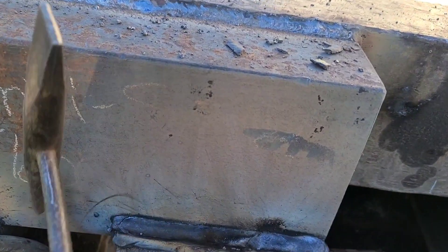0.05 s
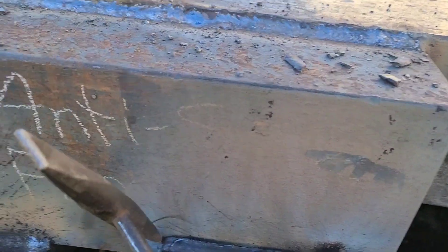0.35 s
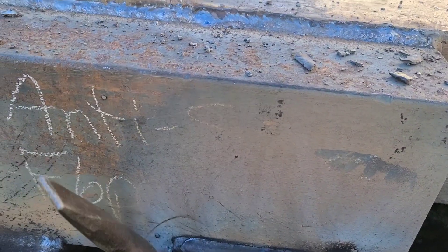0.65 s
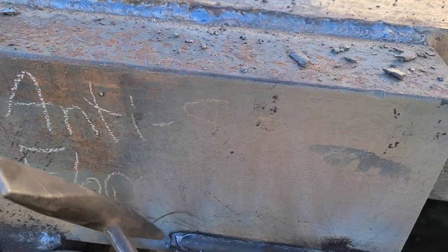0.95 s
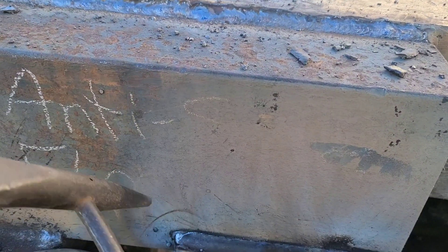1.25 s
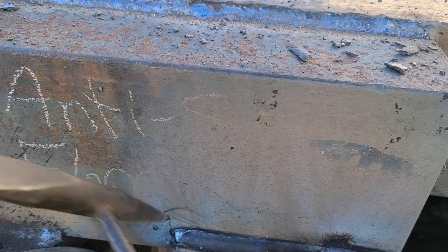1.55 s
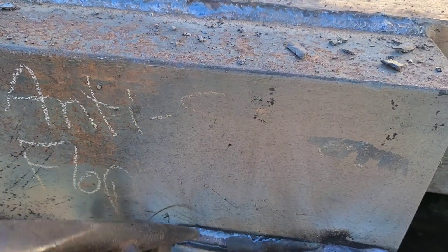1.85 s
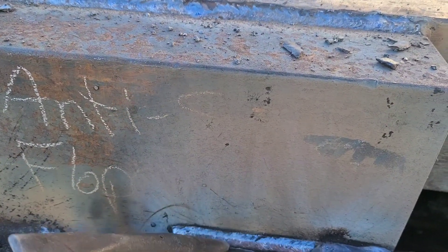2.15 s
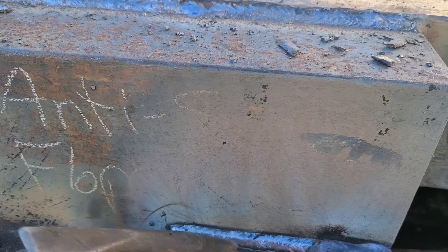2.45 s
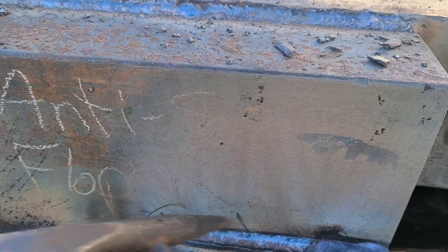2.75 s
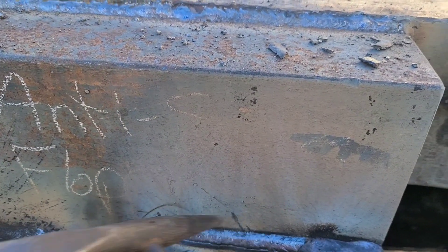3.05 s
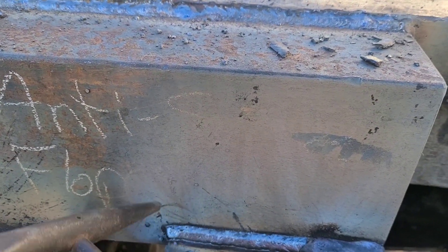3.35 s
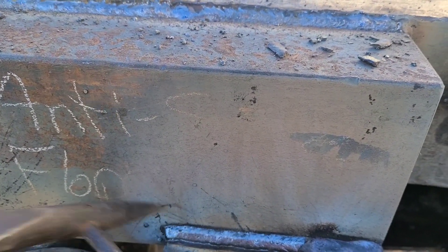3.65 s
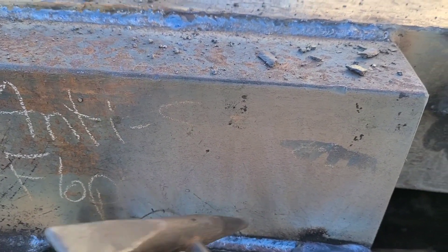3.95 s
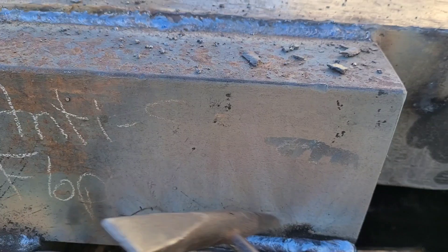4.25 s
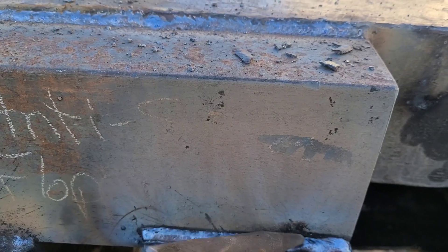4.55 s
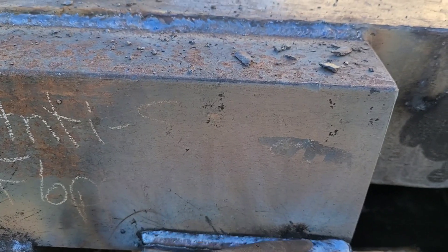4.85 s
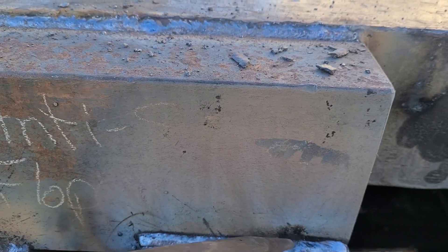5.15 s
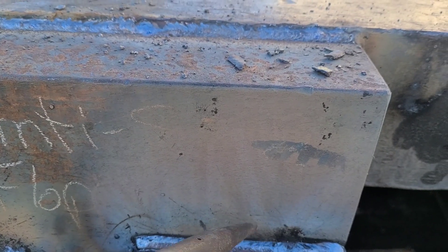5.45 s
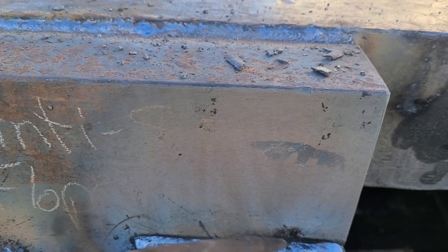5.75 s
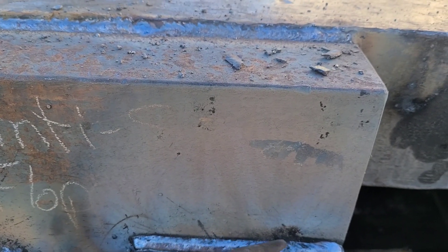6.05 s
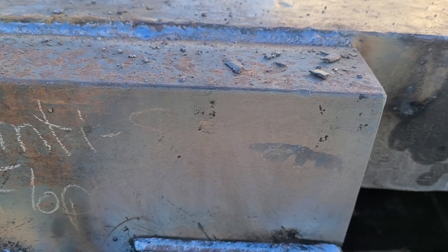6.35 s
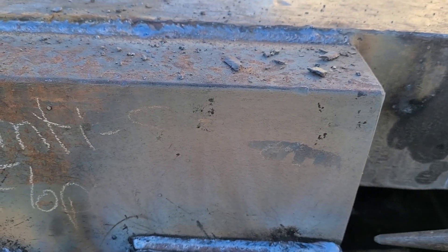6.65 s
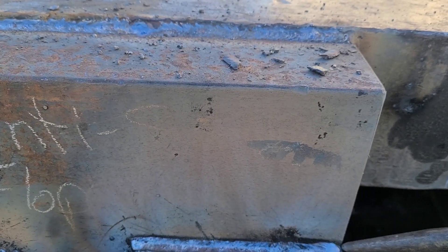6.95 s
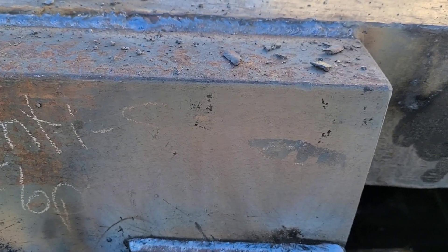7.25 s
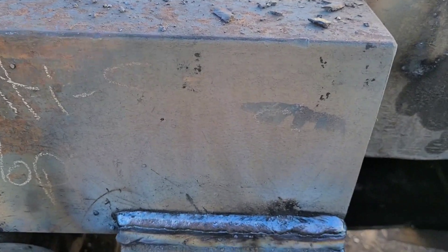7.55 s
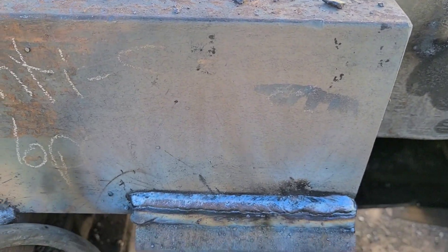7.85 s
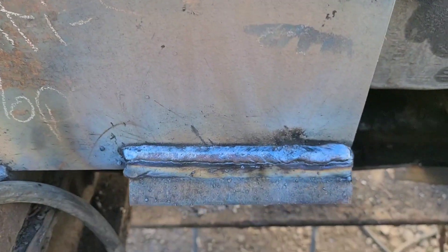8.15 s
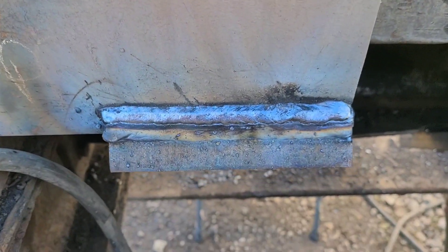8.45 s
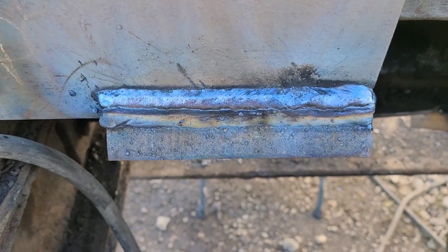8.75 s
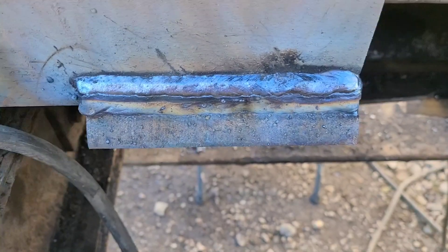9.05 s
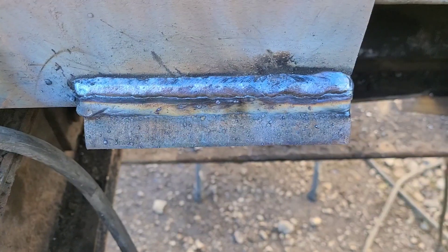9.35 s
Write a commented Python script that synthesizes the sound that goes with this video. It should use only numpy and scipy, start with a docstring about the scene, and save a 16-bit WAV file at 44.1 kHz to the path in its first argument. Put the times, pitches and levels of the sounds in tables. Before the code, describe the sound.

A chipping hammer knocks slag off a weld on a hollow steel beam, about four blows a second. Each blow gives a short clang, a high ping and a soft low boom, with small skips, gritty scrapes and ticking crumbs between. The chipping stops, a soft scuff passes, and the hammer lands hard on a steel bench and bounces to rest. The work sounds close, over a faint workshop hum and rumble.

```python
"""A welding set hums in a workshop, over rumble and hiss. A chipping hammer starts knocking slag off a
fresh weld on a hollow steel beam, about four blows a second. Each blow clangs the beam, pings the hammer
head and wakes a late, low boom; the pick skips, grinds through slag and scatters crumbs. The chipping
stops, a soft scuff passes, and the hammer comes down hard on the steel bench and bounces to rest."""
import sys
import numpy as np
from scipy import signal
from scipy.io import wavfile

SR = 44100
rng = np.random.default_rng(int(sys.argv[2]) if len(sys.argv) > 2 else 0)


def file_out(sig):
    """Save sig as 16-bit WAV at sys.argv[1]."""
    # one column per channel
    cols = np.atleast_2d(sig).T
    # limit, then scale
    lim = np.clip(cols, -1, 1)
    pcm = np.round(lim * 32767).astype(np.int16)
    wavfile.write(sys.argv[1], SR, pcm)


N = 423360
TIME = np.arange(N) / SR
AGE = TIME[:SR // 2]   # seconds since a hit
EDGES_HZ = 22 * 2 ** np.arange(0, 9.7, .4)
BAND_HZ = np.sqrt(EDGES_HZ[1:] * EDGES_HZ[:-1])

# stereo width of all noise: frequency_hz, left_right_correlation
STEREO_LIKENESS = [(30, 0.96), (130, 0.65), (400, 0.12), (700, 0.39), (1400, -0.5), (3000, -0.036),
                   (7000, 0.11)]
# tone of the workshop's rumble: frequency_hz, level_db
RUMBLE_COLOUR = [(15, -41), (25, -12), (70, 3.5), (175, -12.5), (200, -13.5), (285, -10.5), (317, -21.5),
                 (373, -10.5), (489, -26.5), (575, -15.5), (911, -20.5), (1100, -19.5), (6920, -40),
                 (16000, -57)]
# fader ride on the hiss: time_s, level_db
HISS_FADER = [(0, -47.5), (.5, -62.5), (8.2, -64), (9.6, -75)]
# tone of the hiss: frequency_hz, level_db
HISS_COLOUR = [(1000, 3), (2500, 0), (6500, -5.5), (9000, -13), (12500, -13), (16000, -5.5)]
# partials of the welding set's fan: pitch_hz, level_db
FAN_PARTIALS = [(172, -68), (285.3, -61), (382, -76), (570.6, -60), (856, -74), (1141, -74)]

# pick on weld, plus two soft booms near 6.35 s as the steel rocks; bite is high on bare steel,
# low on slag: start_s, strength_db, boom_db, bite_db, ping_db
BEAM_HITS = [(0.456, -16, -27, -18, 8.5), (0.5272, -11.5, -17.5, -6, -1), (0.75, -2.5, -8.5, -14.5, 7.5),
             (0.7925, -5, -23, -16, 4), (1.005, 4.5, 0, -17.5, -27), (1.255, -11, -13, 12, -7),
             (1.2652, -2.5, -14.5, -18, 5), (1.4932, -7, -16, -7.5, 16.5), (1.5049, 1.5, -4, -6.5, -21),
             (1.7538, 5, 2.5, -12, 3), (1.995, 0, 3, 2, 4), (2.2602, -1, 1, 3.5, 13.5),
             (2.2887, -9, -7, 6.5, 7), (2.522, 0, 1.5, 4, -8), (2.765, -12.5, -14.5, 5.5, 6),
             (2.782, -0.5, -1, 1, 15), (3.039, -1, 2.5, 0.5, -31), (3.366, 2, -5.5, -19.5, -7.5),
             (3.5946, -15, -5.5, -8.5, -12), (3.661, 0, -3.5, -1, 5.5), (3.839, 0, -10, -14.5, 2),
             (3.8555, 2, -1.5, -6.5, 2), (4.194, -11.5, -1.5, 14, -10.5), (4.465, 3, 4.5, -3.5, -23),
             (4.696, -10.5, -14, -7, 4), (4.716, -13, -8.5, 11, -7.5), (4.957, -14, -14, 7, -4.5),
             (5.007, -19.5, -10, -14, 5), (5.211, -6.5, -13.5, -1, 2.5), (5.2148, -2, -8, -4.5, 4),
             (5.448, -6, 4, -9, 1.5), (5.694, 1.5, -8, -5.5, -8.5), (5.9393, 4, -0.5, -1.5, 4.5),
             (6.196, 4, 2.5, -1.5, -10), (6.331, -38, -13, -1, 3.5), (6.365, -25, -17, -6, -2.5),
             (6.704, -.5, -12, 3.5, 9), (6.902, 4, -7.5, -8.5, -11), (7.1171, 3, -6, -0.5, 6),
             (7.136, -5.5, -10.5, -6.5, 6.5), (7.3304, -0.5, -5.5, 1, 14.5), (7.348, -1, -16, -10, -2)]
# the five EQ points that colour each hit: frequency_hz
REGISTER_HZ = [750, 1300, 2100, 4500, 9500]
# the spot struck moves along the weld, tipping the clank to 2.1 kHz (-) or 1.3 kHz (+): time_s, tilt_db
SPOT_TILT = [(0.75, 0.5), (1.8, -2.5), (3.0, 1), (3.7, -5), (4.5, 2), (6.2, 1.6), (6.7, 7), (7.4, 6)]
# the beam's crowd of short modes: frequency_hz, level_db
BEAM_CLANG = [(150, 4), (250, 6), (330, 16.5), (600, 18), (900, 14), (1200, 17.5), (1500, 16.5), (2050, 18),
              (2700, 14), (4200, 13), (5400, 11.5), (9000, 5), (10500, -2.5), (14500, 6.5)]
# clear notes of the beam, plus the long ring of the hammer and its spring handle:
# pitch_hz, level_db, t60_s
BEAM_HIT_MODES = [(71.5, -53.5, .6), (115, -49.5, .8), (410, -37.5, 0.11), (508, -32, 0.27),
                  (698, -49, 0.69), (800, -27, 0.17), (962, -43, 0.28), (1070, -31, 0.18),
                  (1138, -31, 0.22), (1300, -44.5, 0.76), (1316.6, -27, 0.2), (1632, -25, 0.2),
                  (1792, -46.5, 1), (1843, -22.5, 0.14), (1862, -29, 0.31), (2012, -26, 0.19),
                  (2067, -22, 0.15), (2190, -19, 0.067), (2460, -50.5, 0.24), (2674, -47, 0.63),
                  (2370, -47, 0.21), (3185, -53.5, 0.57)]
# the hammer head's ping: pitch_hz, level_db, t60_s
HAMMER_MODES = [(4050, -19, .025), (4180, -17, .04), (4250, -28, .1), (6196, -28, .055), (8380, -21.5, .04),
                (8460, -21.5, .055), (8520, -47, .2), (9377, -25, .045), (11960, -33, .03),
                (13937, -28.5, .06)]
# clang envelope, before each body's decay_scale: frequency_hz, rise_s, steel_t60_s, room_db, room_t60_s
CLANG_ENVELOPE = [(194, 0.0051, 0.44, -12, 0.22), (800, 0.0025, 0.16, -37, 0.15),
                  (2240, 0.0035, 0.15, -30, 0.61), (4860, 0.00024, 0.056, -37.5, 0.33),
                  (8900, 0.0016, 0.057, -27, 0.11), (15000, .0003, 0.059, -39, .16)]
# where the hits sit in the stereo image: frequency_hz, left_minus_right_db
HIT_PAN = [(450, -2.5), (2000, 0.36), (4500, 1.5), (8400, 2), (13900, -1.5)]
# the hollow beam's boom swells late and returns in beats: delay_s, level_db, half_width_s
BOOM_BEATS = [(0.0219, -13.5, 0.0068), (0.042, -23, 0.0071), (.062, -27, 0.0044), (.098, -31, .016),
              (0.124, -43, 0.027)]
# the pick's hardest skips on the bead: start_s, level_db
SKIPS = [(0.737, -26.5), (0.828, -28.5), (0.9028, -36), (1.086, -36), (1.3515, -30.5), (2.233, -18),
         (2.3054, -27), (3.0785, -26.5), (3.4035, -28), (3.917, -26.5), (3.9472, -28), (5.2144, -15),
         (5.5256, -25.5), (5.7382, -27.5), (6.7535, -35)]
# tone of a skip: frequency_hz, level_db
SKIP_CLANG = [(300, 5), (600, 9.5), (1200, 5.4), (2100, 6.7), (3000, 4.7), (4200, 6.6), (5400, 18),
              (9000, 7.9), (10500, 2.7), (14500, 6.4)]
# the pick grinds through slag: start_s, end_s, level_db
GRINDS = [(1.512, 1.541, -30), (2.204, 2.273, -40.5), (4.702, 4.792, -44.5), (4.961, 5.041, -48),
          (6.233, 6.307, -51)]
# a piece of slag breaks up in a shower: start_s, end_s, level_db
SHOWERS = [(2.074, 2.201, -35.5)]
# tone of a crumb's tick: frequency_hz, level_db
CRUMB_COLOUR = [(400, 8.5), (900, -14.5), (3000, -6.5), (7000, 7.5), (12000, 7.5), (16000, 9)]

# tone of the scuff: frequency_hz, level_db
SCUFF_COLOUR = [(150, -1), (400, 4), (900, -9.5), (1600, -13), (7000, -16.5), (9500, -26.5), (13000, -17),
                (16000, -27)]
# hammer on bench, head first, then handle and bounces: start_s, strength_db, thud_db, dull_above_hz
BENCH_HITS = [(8.3362, 1, -6.5, 15200), (8.3753, 2.5, -0.5, 4600), (8.442, -28.5, 13.5, 2300),
              (8.474, -19.5, 6.5, 1220)]
# the bench's crowd of short modes: frequency_hz, level_db
BENCH_CLANG = [(100, 2.5), (200, 21), (300, 8), (450, 24.5), (1000, 27.5), (1400, 25), (2000, 26.5),
               (3000, 21), (4500, 15), (7000, 0), (10000, -1), (15000, -4.5)]
# clear notes of the bench, plus the long ring of the hammer and its spring handle:
# pitch_hz, level_db, t60_s
BENCH_HIT_MODES = [(208.6, -23, 0.0965), (408.6, -22, 0.21), (535, -31.5, 0.19), (765, -25.5, 0.16),
                   (927, -30, 0.3), (1028, -23, 0.13), (1293, -33.5, 0.64), (1850, -17, 0.15),
                   (2140, -26.5, 0.12), (3000, -24, .14), (4370, -25.5, .1)]


def from_db(db):
    """Decibels to gain."""
    return 10 ** (np.asarray(db) / 20)


def at_hz(rows, hz, column=1):
    """Read a column of a table along log frequency."""
    rows = np.array(rows)
    return np.interp(np.log(hz), np.log(rows[:, 0]), rows[:, column])


def drift(rate_hz):
    """A smooth random wobble with a spread near 1."""
    knots = np.arange(0, TIME[-1] + 1, 1 / rate_hz)
    return np.interp(TIME, knots, rng.standard_normal(2000)[:len(knots)])


def add(out, start_s, sound):
    """Mix a sound in at its cue."""
    start = round(start_s * SR)
    out[:, start:start + sound.shape[-1]] += sound[..., :N - start]


def noise_bands():
    """Raw material for beds and clangs, white noise split into stereo bands: bands x 2 x N."""
    white, bands = rng.standard_normal((2, 2, N)), []
    for k, hz in enumerate(BAND_HZ):
        bandpass = signal.butter(2, EDGES_HZ[k:k + 2], "band", fs=SR, output="sos")
        mid, side = signal.sosfilt(bandpass, white[k % 2])
        alike = at_hz(STEREO_LIKENESS, hz)
        bands.append(np.sqrt((1 + alike) / 2) * mid + np.sqrt((1 - alike) / 2) * side * [[1], [-1]])
    return np.array(bands, np.float32)


def wash(bands, colour, flicker_db):
    """A noise bed of rms 1 whose bands flicker."""
    out = sum(band * from_db(at_hz(colour, hz) + flicker_db * drift(25))
              for band, hz in zip(bands, BAND_HZ))
    return out / np.std(out)


def room_tone(bands, rumble_db=-51):
    """The workshop's steady rumble, and a hiss that drops back early and fades at the end."""
    rumble = from_db(rumble_db) * wash(bands[:, :, ::-1], RUMBLE_COLOUR, flicker_db=2)
    hiss_db = np.interp(TIME, *np.transpose(HISS_FADER))
    return rumble + from_db(hiss_db) * wash(bands, HISS_COLOUR, flicker_db=1.5)


def fan_hum(speed_wobble=0.002, waver_db=0.8):
    """The welding set's fan: its partials bend together with its speed, and each wavers in level."""
    fan_time = TIME + np.cumsum(speed_wobble * drift(5)) / SR
    return sum(from_db(db + waver_db * drift(5)) * np.sqrt(2) * np.sin(2 * np.pi * hz * fan_time)
               for hz, db in FAN_PARTIALS)


def pan(hz):
    """Left and right gain of a hit: frequencies x 2 x 1."""
    return from_db(at_hz(HIT_PAN, hz)[:, None, None] * np.array([[.5], [-.5]]))


def clang_envelope(decay_scale, crack_db=12.5, crack_t60_s=0.0037):
    """Unit energy per band: the crack of contact, the steel's quick ring, then the room's tail."""
    rise, steel_t60, room_db, room_t60 = [at_hz(CLANG_ENVELOPE, BAND_HZ, k)[:, None] for k in range(1, 5)]
    crack = from_db(crack_db - 60 * AGE / crack_t60_s)
    steel = from_db(-60 * AGE / (steel_t60 * decay_scale))
    room = from_db(room_db - 60 * AGE / (room_t60 * decay_scale))
    envelope = (1 - np.exp(-AGE / rise)) * (crack + steel + room)
    return envelope / np.sqrt(np.sum(envelope ** 2, axis=1, keepdims=True))


def strike(bands, hits, clang, modes, decay_scale, sameness, modes_db=0, scatter_db=0):
    """Hits (start_s, register_db, ping_db) excite a body: a dense noisy clang under its clear modes."""
    out = np.zeros((2, N))
    envelope = (clang_envelope(decay_scale)[:, None] * pan(BAND_HZ)).astype(np.float32)
    repeated = envelope * bands[:, :, -len(AGE):]   # the part of the clang that every hit shares
    hz, mode_db, t60 = np.reshape(modes, (-1, 3)).T
    # higher modes sit further out of phase between left and right
    apart_rad = rng.choice([-1, 1], len(hz)) * np.minimum(hz / 700, 1.65)
    phase = rng.uniform(0, 2 * np.pi, (len(hz), 1, 1)) + apart_rad[:, None, None] * [[.5], [-.5]]
    decay = from_db(-60 * AGE / t60[:, None, None])
    rings = pan(hz) * np.sin(2 * np.pi * hz[:, None, None] * AGE + phase) * decay
    for start_s, register_db, ping_db in hits:
        eq = np.column_stack([REGISTER_HZ, register_db])
        fresh = envelope * bands[:, :, round(start_s * SR):][:, :, :len(AGE)]
        noise = np.sqrt(sameness) * repeated + np.sqrt(1 - sameness) * fresh
        band_gains = from_db(at_hz(clang, BAND_HZ) + at_hz(eq, BAND_HZ))
        # a square hit favours the hammer's highest modes; the spot struck shifts each mode's share
        square_db = ping_db * (hz / HAMMER_MODES[-1][0]) ** 1.4
        spot_db = rng.normal(0, scatter_db, len(hz))
        mode_gains = from_db(mode_db + modes_db + square_db + at_hz(eq, hz) + spot_db)
        add(out, start_s, np.tensordot(band_gains, noise, 1) + np.tensordot(mode_gains, rings, 1))
    return out


def chipping(bands):
    """Blows ring beam and hammer together: bright on bare steel, dull where slag cushions the pick."""
    hits = []
    for start_s, strength_db, boom_db, bite_db, ping_db in BEAM_HITS:
        low_db = 2.5 + 0.6 * (boom_db - strength_db)   # a boomy hit also fills the low clang
        tilt_db = np.interp(start_s, *np.transpose(SPOT_TILT))
        high_db = -1 + 0.45 * bite_db
        colour_db = np.array([low_db, tilt_db, -tilt_db, high_db, bite_db])
        hits.append((start_s, strength_db + colour_db, ping_db))
    return strike(bands, hits, BEAM_CLANG, BEAM_HIT_MODES + HAMMER_MODES,
                  decay_scale=0.98, sameness=0.53, modes_db=-2.5, scatter_db=4)


def boom(pitch_hz=452.9, spread_hz=6.1, pan_db=1.5, uneven_db=4):
    """Struck or rocking, the beam's wall answers with one low note that throbs as it fades."""
    out = np.zeros((2, N))
    for start_s, _, boom_db, *_ in BEAM_HITS:
        hz = pitch_hz + spread_hz * rng.normal()
        for delay_s, db, width_s in BOOM_BEATS:
            stray = min(delay_s / BOOM_BEATS[-2][0], 1)   # later beats stray more in level and phase
            gain = from_db(boom_db + db + stray * uneven_db * rng.normal())
            swell = np.exp(-((AGE - delay_s) / width_s) ** 2)
            add(out, start_s, gain * swell * np.sin(2 * np.pi * hz * AGE + stray * rng.normal()))
    return out * from_db([[pan_db / 2], [-pan_db / 2]])


def light_hit(start_s, db, ping_db=-15):
    """A touch with flat EQ, too soft for the hammer's highest modes."""
    return start_s, np.full(len(REGISTER_HZ), db), ping_db


def skips(bands, gain_db=3.5, rebound_s=0.045, rebound_db=-43.5):
    """The pick skips on the bead and drops back after each blow, ringing mostly the hammer head."""
    luck = rng.standard_normal((len(BEAM_HITS), 2))
    rebounds = [(start_s + rebound_s * np.exp(0.11 * late), strength_db + rebound_db + 4 * hard)
                for (start_s, strength_db, *_), (late, hard) in zip(BEAM_HITS, luck)]
    hits = [light_hit(start_s, db + gain_db) for start_s, db in SKIPS + rebounds]
    return strike(bands, hits, SKIP_CLANG, HAMMER_MODES,
                  decay_scale=0.78, sameness=0.72, modes_db=9, scatter_db=2.5)


def grit(grains_per_s=640, size_step_db=5, low_cut_hz=2400, ring_db=-8):
    """Slag crushed under the pick: uneven grains that crackle and tickle the hammer's modes."""
    out, age = np.zeros((2, N)), AGE[:SR // 20]
    ring = sum(from_db(db + ring_db - 60 * age / t60) * np.sin(2 * np.pi * hz * age)
               for hz, db, t60 in HAMMER_MODES)
    low_cut = signal.butter(2, low_cut_hz, "high", fs=SR, output="sos")
    for start_s, end_s, db in GRINDS:
        length_s = end_s - start_s
        breaks = (rng.random(len(AGE)) < grains_per_s / SR) * (AGE < length_s)
        sizes = from_db(size_step_db * np.minimum(rng.exponential(1, len(AGE)), 3))
        grains = breaks * sizes * rng.standard_normal((2, len(AGE)))
        snap = 0.27 * rng.standard_normal((2, len(age))) * np.exp(-age / 0.00054)
        crackle = signal.sosfilt(low_cut, signal.fftconvolve(grains, snap + ring, axes=1))
        rms = np.sqrt(np.sum(crackle ** 2) / (2 * length_s * SR) + 1e-12)
        add(out, start_s, from_db(db) * crackle / rms)
    return out


def crumbs(bands, chance=0.16, flight_s=0.097, stray_db=-37, shower_count=9, gain_db=7.5, uneven_db=0.5):
    """Brittle slag ticks without ringing: strays land just after some blows, and one piece showers."""
    luck = rng.random((len(BEAM_HITS), 2))
    strays = [(start_s + flight_s * (.5 + far), stray_db)
              for (start_s, *_), (thrown, far) in zip(BEAM_HITS, luck) if thrown < chance]
    shower = [(start_s + (end_s - start_s) * (k + rng.random()) / shower_count, db)
              for start_s, end_s, db in SHOWERS for k in range(shower_count)]
    sizes_db = rng.normal(gain_db, uneven_db, len(shower) + len(BEAM_HITS))
    hits = [light_hit(start_s, db + size_db) for (start_s, db), size_db in zip(shower + strays, sizes_db)]
    return strike(bands, hits, CRUMB_COLOUR, modes=[], decay_scale=0.2, sameness=0.1)


def scuff(bands, middle_s=7.7, width_s=0.078, level_db=-44):
    """A soft, dull brush of noise swells and dies."""
    swell = np.exp(-((TIME - middle_s) / width_s) ** 2 / 2)
    return from_db(level_db) * swell * wash(np.roll(bands, SR, axis=2), SCUFF_COLOUR, flicker_db=3)


def hammer_down(bands, steepness=11):
    """The whole hammer lands on the bench, deep and hard; each later contact is duller."""
    hz, hits = np.array(REGISTER_HZ), []
    low_registers = hz < REGISTER_HZ[2]
    for start_s, strength_db, thud_db, dull_above_hz in BENCH_HITS:
        rolloff_db = 10 * np.log10(1 + (hz / dull_above_hz) ** steepness)
        hits.append((start_s, strength_db + thud_db * low_registers - rolloff_db, 0))
    return strike(bands, hits, BENCH_CLANG, BENCH_HIT_MODES,
                  decay_scale=0.84, sameness=0.35, scatter_db=4.5)


def scene():
    """The stereo mix: the hammer's work up front, the workshop behind."""
    bands = noise_bands()
    weld_work = chipping(bands) + boom() + skips(bands) + crumbs(bands) + grit()
    return weld_work + hammer_down(bands) + room_tone(bands) + scuff(bands) + fan_hum()


def record(dry, ceiling=1.5, high_cut_hz=15700):
    """Soft saturation rounds the sharpest peaks, then a steep filter takes off the very top."""
    high_cut = signal.ellip(10, .2, 80, high_cut_hz, fs=SR, output="sos")
    return signal.sosfilt(high_cut, ceiling * np.tanh(dry / ceiling))


dry = scene()
out = record(dry)
file_out(out)
```